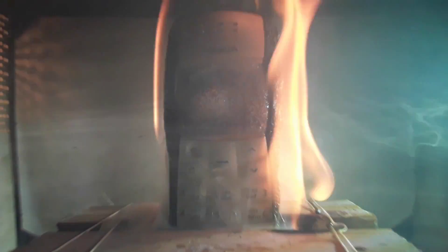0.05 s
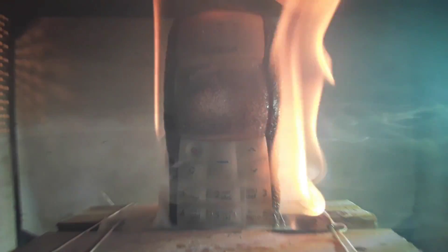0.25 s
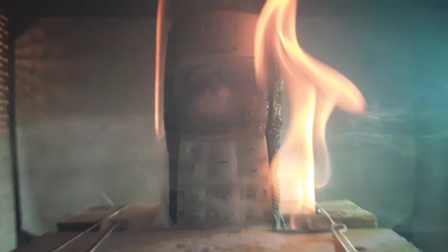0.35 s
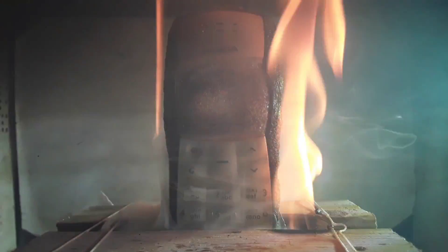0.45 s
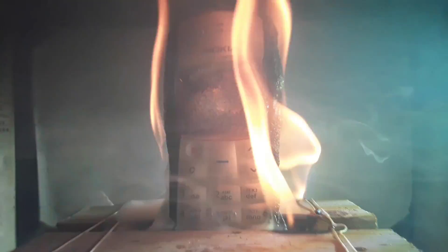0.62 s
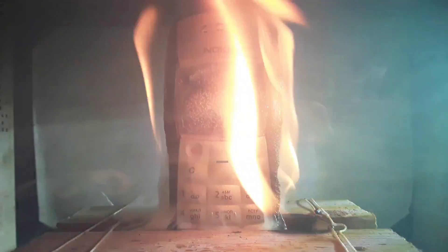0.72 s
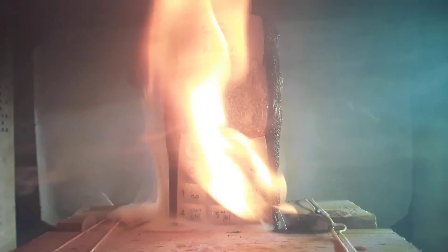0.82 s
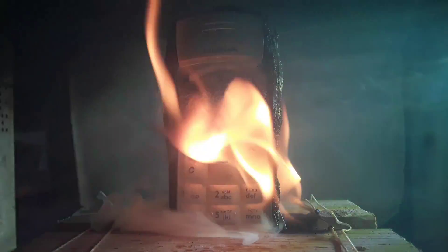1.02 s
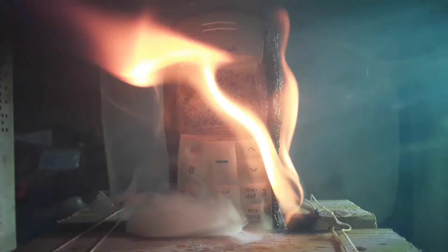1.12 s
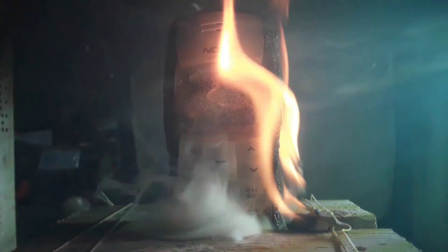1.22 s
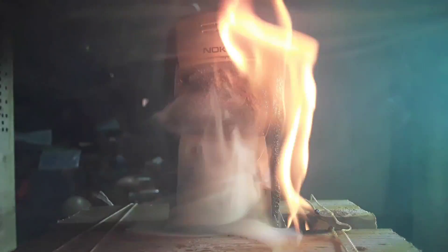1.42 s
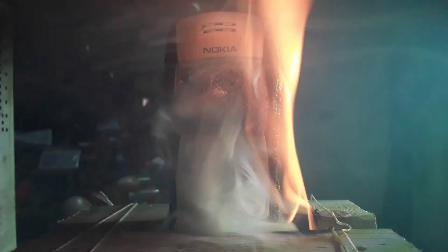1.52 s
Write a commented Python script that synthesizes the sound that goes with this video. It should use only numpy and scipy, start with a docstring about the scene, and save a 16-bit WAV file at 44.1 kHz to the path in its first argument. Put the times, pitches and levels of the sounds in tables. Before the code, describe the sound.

A humming microwave oven switches off and its door clatters open with sharp snaps.

```python
"""A kitchen: a microwave oven hums, fan running, with a phone burning inside. The switch snaps off,
the hum dies and the fan runs down. The door is pushed open with a clatter of knocks and sharp latch
snaps that ring the steel case and the room. The flames are left hissing; a brief rasp swells at the end.
The treble resonance of a close, small microphone is built into the spectra, near 8 kHz."""
import sys
import numpy as np
from scipy import signal
from scipy.fft import irfft, next_fast_len
from scipy.io import wavfile
from scipy.ndimage import uniform_filter1d

SR = 44100
rng = np.random.default_rng(int(sys.argv[2]) if len(sys.argv) > 2 else 0)


def materialize(psi):
    """Save the field psi as 16-bit PCM at rate SR to the path in sys.argv[1].

    A 1-D psi becomes a single channel; in a 2-D psi each row is a channel.
    """
    bounded = np.clip(np.atleast_2d(psi).T, -1, 1)
    quanta = np.round(bounded * 32767).astype(np.int16)
    wavfile.write(sys.argv[1], SR, quanta)


N = 68355

POWER_OFF_S = 0.528
ROOM = dict(room_db=-20.5, room_t60_s=0.51)
ROOM_TREBLE = dict(room_db=-20, room_t60_s=0.29)
# switch snap, then latch snaps: t/s, level/dB, dull part re snap/dB, ring f/Hz, t60/s
SNAP_HITS = [(.5162, -22, -2.5, 7480, 0.087), (0.643, -28, -3, 7900, 0.014),
             (0.6728, -23.5, 9, 8200, 0.051), (0.752, -20, -14, 8080, 0.1), (0.7781, -13, 1.5, 8080, 0.099),
             (0.853, -10.5, -2, 8100, 0.057), (0.8948, -19, 5.5, 8440, 0.08), (0.9145, -31, 0, 8280, 0.027),
             (1.0157, -14, 0, 8000, 0.062)]
# door knocks: t/s, thump/dB, body/dB, clack/dB, rise/s, t60/s, note f/Hz, note level/dB
DOOR_KNOCKS = [(0.6657, -44, -20, -22.5, 0.0012, 0.12, 1950, -13.5),
               (0.6901, -21, -21, -26, 0.0015, 0.19, 2250, -17.5),
               (0.7104, -32.5, -20, -22.5, .002, 0.19, 760, -14),
               (0.7194, -24, -24.5, -21, 0.0015, 0.36, 2570, -13),
               (0.7307, -33, -23.5, -19.5, .001, 0.13, 1030, -12),
               (0.7417, -15, -20.5, -24, 0.001, 0.14, 1100, -16),
               (0.7518, -16.5, -19.5, -22, 0.001, 0.065, 420, -33),
               (0.7655, -22, -22, -24.5, 0.0015, 0.067, 900, -12),
               (0.788, -33, -21.5, -26.5, 0.0019, 0.21, 1530, -34),
               (0.9057, -46, -24.5, -16.5, 0.0007, 0.051, 600, -13),
               (0.9105, -43, -24, -19, .0007, 0.068, 757, -11),
               (0.915, -59, -18, -18, 0.0006, 0.082, 2428, -21),
               (0.929, -45, -22.5, -36, .002, 0.16, 1050, -19)]


def snaps():
    """Switch, then latches: gritty crack, ringing metal, dull door body, low reverberant bloom."""
    # switch with its bracket, and door latch: f/Hz, level/dB (latch: re snap), t60/s
    switch_modes = [(650, -27, .06), (1400, -30, .06), (2030, -28, .06), (4060, -27, .05), (6300, -28, .05),
                    (6735, -24, .06), (6982, -27, .08), (7830, -20, .065), (10350, -34, .05)]
    latch_modes = [(7621, -14, .1), (7895, -10, .11), (8140, -9, .07), (8305, -11, .1), (8425, -10, .1),
                   (9033, -13, .1), (9663, -19, .08), (10360, -24, .08)]
    # noise parts of a snap: f/Hz, level/dB
    crack_spectrum = [(3000, -18.5), (5500, -13), (7000, -10), (7800, 1.5), (8400, 3), (9500, -4),
                      (11500, -20), (13500, -18.5), (16000, -33)]
    body_spectrum = [(60, -24), (250, 5.5), (700, 3), (1100, 3), (1400, 7), (1900, 6), (4000, 1.5),
                     (6000, -5), (12000, -30)]
    bloom_spectrum = [(50, -28.5), (120, -13), (260, -2), (520, 3.5), (800, -8), (2000, -8), (4000, -39)]
    crack_peak_hz = 8200
    out = ring(switch_modes, SNAP_HITS[0][0], rise_s=0.00032)
    for t_s, db, dull_db, ring_hz, t60_s in SNAP_HITS:
        grit = unit(undb(2.2 * walk(1200)))
        crack = undb(-2.5) * noise(crack_spectrum, ring_hz / crack_peak_hz) * grit
        crack *= blow(t_s, 0.00037, t60_s, hold_s=0.0043, **ROOM_TREBLE)
        body = undb(-7) * noise(body_spectrum)
        body *= blow(t_s, rise_s=0.005, t60_s=0.17, room_db=-30, room_t60_s=0.22)
        bloom = undb(-15) * noise(bloom_spectrum) * attack(t_s, 0.018) * fade(t_s, 0.42)
        out += undb(db) * (crack + undb(dull_db) * (body + bloom))
    for t_s, db, *_ in SNAP_HITS[1:]:
        out += undb(db) * ring(latch_modes, t_s, rise_s=0.00091)
    return out


def chatter():
    """Each snapping part bounces in a quick, uneven run of dry clicks."""
    # one bounce: f/Hz, level/dB, t60/s
    click_modes = [(4500, -14, .002), (7300, -6, .002), (8250, 0, .004), (10500, -14, .0015),
                   (13300, -16, .0015)]
    bounces, mean_gap_s, first_db, loss_db = 5, 0.0016, 2.6, 1
    hits = np.zeros(N)
    for t_s, db, *_ in SNAP_HITS:
        gaps_s = mean_gap_s * (0.5 + rng.random(bounces))
        times_s = t_s + np.cumsum(gaps_s) - gaps_s[0]
        hits[(times_s * SR).astype(int)] += undb(db + first_db - loss_db * np.arange(bounces))
    return signal.fftconvolve(hits, ring(click_modes, 0, rise_s=0.0001))[:N]


def door():
    """The door jolts free. Per knock: thump, hollow body, plastic clack, note of the struck part."""
    # low, damped panel modes: f/Hz, level re thump/dB, t60/s
    panel_modes = [(135, -4, .025), (245, 4, .018)]
    # noise parts of a knock: f/Hz, level/dB
    boom_spectrum = [(30, -55.5), (58, -17), (90, -19), (130, -1.5), (250, 7.5), (340, -0.5), (700, -51)]
    body_spectrum = [(150, -15), (300, -9.5), (460, -4), (620, -5), (860, -2.5), (1150, -8), (1600, -6),
                     (4000, -52.5)]
    clack_spectrum = [(600, -25.5), (1300, -33), (1900, 1.5), (2400, -5), (3000, 0), (4000, -9.5),
                      (5800, -16), (8200, -3), (10500, -21.5), (15000, -39.5)]
    boom_t60_s, note_t60_s = 0.12, 0.038
    out = np.zeros(N)
    for t_s, thump_db, body_db, clack_db, rise_s, t60_s, note_hz, note_db in DOOR_KNOCKS:
        boom = undb(-2.5) * noise(boom_spectrum) * blow(t_s, rise_s, boom_t60_s, **ROOM)
        thump = undb(thump_db) * (ring(panel_modes, t_s, rise_s) + boom)
        body = undb(body_db) * noise(body_spectrum) * blow(t_s, rise_s, t60_s, **ROOM)
        clack = undb(clack_db) * noise(clack_spectrum) * blow(t_s, rise_s, t60_s, **ROOM_TREBLE)
        rattle = unit(undb(1.5 * walk(600)))
        note = ring([(note_hz, note_db, note_t60_s)], t_s, rise_s)
        out += thump + body + clack * rattle + note
    return out


def swing():
    """The freed door wobbles on its hinges and clunks against its stop."""
    # door on its stop: f/Hz, level/dB, t60/s
    stop_modes = [(390.5, -22.5, 0.19), (479, -16, 0.18), (1000, -33.5, 0.066), (1242, -27, 0.19)]
    wobble_hz, wobble_db, wobble_t60_s = 58, -29, 0.7
    wobble = ring([(wobble_hz, wobble_db, wobble_t60_s)], t_s=0.743, rise_s=0.0043)
    return wobble + ring(stop_modes, t_s=0.914, rise_s=0.00123)


def scrape():
    """The metal latch hook drags briefly over its catch."""
    # hook resonances: f/Hz, width/Hz, level/dB
    hook_bands = [(3540, 220, -31.5), (4610, 220, -25.5), (4970, 200, -28.5)]
    t_s, hold_s = 0.7215, 0.0068
    return stirred(hook_bands) * attack(t_s, 0.00207) * fade(t_s + hold_s, 0.05)


def case():
    """Every knock and snap rings the steel case; reflections blur its modes."""
    # steel case: f/Hz, level/dB, t60/s
    case_modes = [(128.2, -44, 0.92), (256, -44, 0.9), (480, -41, 0.49), (505, -41, 0.66), (845, -36, 0.4),
                  (980, -37.5, 0.34), (1050, -37.5, 0.26), (1212, -39, 0.33), (1860, -35, 0.11),
                  (2040, -42, 0.45), (2566, -45, 0.17), (2923, -46, 0.2), (3490, -43, 0.16)]
    snap_drive_db, rise_s, blur_hz = 2.5, 0.004, 55
    max_body_db = max(row[2] for row in DOOR_KNOCKS)
    max_snap_db = max(row[1] for row in SNAP_HITS)
    hits = np.zeros(N)
    for t_s, _, body_db, *_ in DOOR_KNOCKS:
        hits[int(t_s * SR)] += undb(body_db - max_body_db) ** 2
    for t_s, db, dull_db, *_ in SNAP_HITS:
        hits[int(t_s * SR)] += undb(snap_drive_db + db + dull_db - max_snap_db) ** 2
    rise_pole = np.exp(-1 / (rise_s * SR))
    drive = signal.lfilter([1 - rise_pole], [1, -rise_pole], hits) + 1e-18
    out = np.zeros(N)
    for hz, db, t60_s in case_modes:
        decay_pole = np.exp(-2 * np.log(1000) / (t60_s * SR))
        energy = signal.lfilter([1], [1, -decay_pole], drive)
        out += undb(db) * np.sqrt(energy) * np.sin(2 * np.pi * hz * since(0) + 2 * walk(blur_hz))
    return out


def transformer():
    """Mains hum that dies quickly at power-off."""
    # hum: harmonic number, rms level/dB
    harmonics = [(1, -35.5), (2, -43), (3, -51.5), (4, -47.5), (5, -53.5)]
    hum_hz = 100.37
    hum = sum(undb(db) * sine(k * hum_hz * since(0)) for k, db in harmonics)
    return np.sqrt(2) * hum * fade(POWER_OFF_S, 0.14)


def fan():
    """Wavering blade tones, stirred case and rushing air; the fan runs down after power-off."""
    # blade tones: harmonic number, rms level/dB
    harmonics = [(1, -43.5), (2, -45), (3, -49.5), (4, -51), (6, -57)]
    # case resonances: f/Hz, width/Hz, level/dB
    drone_bands = [(116.3, 20, -55), (410, 30, -48), (440.3, 45, -48), (509, 18, -51), (1044, 30, -54)]
    # air rush: f/Hz, level/dB
    air_spectrum = [(24, -70), (40, -15.5), (66, -31.5), (91, -5), (244, -10.5), (432, -5), (784, -15.5),
                    (2580, -20.5), (4230, -32.5), (8270, -35), (15000, -74)]
    blade_hz, sag_per_s, waver_db = 144.1, 0.65, 2.5
    cycles = np.cumsum(blade_hz * np.exp(-sag_per_s * since(POWER_OFF_S))) / SR
    blades = sum(undb(db + waver_db * walk(11)) * sine(k * cycles) for k, db in harmonics)
    running = np.sqrt(2) * blades + stirred(drone_bands) + undb(-35.5) * noise(air_spectrum)
    return running * fade(POWER_OFF_S, 1.08)


def flames():
    """Burning plastic hisses in swells with a fine flicker, and spits once, faintly."""
    # hiss and spit: f/Hz, level/dB
    hiss_spectrum = [(500, -20), (2000, -7), (5500, -12.5), (7000, -7), (8250, 2.5), (9500, -10),
                     (11500, -26), (15000, -36)]
    spit_spectrum = [(1200, -22), (2400, -9), (3100, 7), (3900, -11), (7000, -20), (12000, -35)]
    # hiss swells: t/s, level/dB
    swells = [(0, -49.5), (.1, -44.5), (.25, -37), (.38, -41), (0.458, -47.5), (0.619, -53.5),
              (1.149, -61.5), (1.43, -67), (1.482, -48.5), (1.52, -44.5), (1.55, -45)]
    spit_s, flicker_db = 1.247, 0.5
    spit = undb(-56.5) * noise(spit_spectrum) * attack(spit_s, 0.0025) * fade(spit_s, 0.058)
    hiss_db = np.interp(since(0), *np.transpose(swells))
    return noise(hiss_spectrum) * undb(hiss_db + flicker_db * walk(400)) + spit


def rasp():
    """A soft rasp swells at the end and starts to fall."""
    # rasp: f/Hz, level/dB
    spectrum = [(100, -29), (900, -9), (1400, -4), (1850, 6), (3200, 1.5), (5500, -8), (8200, -4),
                (11000, -32), (15000, -43)]
    peak_s, rise_s, fall_s = 1.518, 0.015, 0.1
    age_s = since(0) - peak_s
    envelope = np.exp(np.minimum(age_s / rise_s, -age_s / fall_s))
    return undb(-42 + 1.9 * walk(250)) * noise(spectrum) * envelope


def kitchen():
    """Steady, quiet room noise."""
    # room noise: f/Hz, level/dB
    spectrum = [(18, -62), (30, -35), (75, -3.5), (99, -18), (260, -15), (304, -25.5), (384, -16),
                (735, -25), (2130, -36), (4900, -74), (8250, -22.5), (15000, -69)]
    return undb(-57) * noise(spectrum)


def ring(modes, t_s, rise_s):
    """Struck modes (f/Hz, level/dB, t60/s) that swell briefly and decay."""
    tone = sum(undb(db) * fade(t_s, t60_s) * sine(hz * since(t_s)) for hz, db, t60_s in modes)
    return tone * attack(t_s, rise_s)


def stirred(bands):
    """Resonances (f/Hz, width/Hz, level/dB) kept ringing by irregular pushes."""
    out = np.zeros(N)
    for hz, width_hz, db in bands:
        pushes = walk(width_hz) + 1j * walk(width_hz)
        out += undb(db) * np.real(pushes * np.exp(2j * np.pi * hz * since(0)))
    return out


def noise(spectrum, pitch_ratio=1):
    """Noise of rms 1, shaped by spectral density points (f/Hz, level/dB)."""
    hz, db = np.array(spectrum, float).T
    size = next_fast_len(N)
    bins_hz = np.maximum(np.fft.rfftfreq(size, 1 / SR), 1)
    gain = undb(np.interp(np.log(bins_hz), np.log(hz * pitch_ratio), db))
    phasors = np.exp(2j * np.pi * rng.random(len(bins_hz)))
    return unit(irfft(gain * phasors, size)[:N])


def blow(t_s, rise_s, t60_s, room_db, room_t60_s, hold_s=0):
    """Impact envelope: rise, hold, decay of the oven, tail of the kitchen."""
    tail = undb(room_db) * fade(t_s, room_t60_s)
    return attack(t_s, rise_s) * np.hypot(fade(t_s + hold_s, t60_s), tail)


def attack(t_s, rise_s):
    """0 until t_s, then an exponential approach to 1."""
    return 1 - np.exp(-since(t_s) / rise_s)


def fade(t_s, t60_s):
    """1 until t_s, then an exponential decay."""
    return np.exp(-np.log(1000) * since(t_s) / t60_s)


def walk(rate_hz):
    """Smooth random wander of rms 1."""
    step = max(int(SR / rate_hz), 1)
    stairs = np.repeat(rng.standard_normal(N // step + 1), step)
    return unit(uniform_filter1d(stairs, step)[:N])


def sine(cycles):
    """Sine with a random starting phase."""
    return np.sin(2 * np.pi * (cycles + rng.random()))


def since(t_s):
    """Seconds since t_s, 0 before it."""
    return np.maximum(np.arange(N) / SR - t_s, 0)


def undb(db):
    """Decibels to gain."""
    return 10 ** (np.asarray(db) / 20)


def unit(x):
    """Scale to rms 1."""
    return x / np.sqrt(np.mean(x ** 2))


def scene():
    """Oven, door and fire in a quiet kitchen; mono."""
    oven = transformer() + fan()
    clatter = snaps() + chatter() + door() + scrape() + case() + swing()
    return (oven + clatter + flames() + rasp() + kitchen())[None]


def record(dry):
    """The recorder cuts the deepest bass and the top."""
    low_hz, top_hz = 38, 15600
    highpass = signal.butter(4, low_hz, "high", fs=SR, output="sos")
    lowpass = signal.ellip(8, 0.2, 70, top_hz, fs=SR, output="sos")
    return signal.sosfilt(lowpass, signal.sosfilt(highpass, dry))


dry = scene()
out = record(dry)
materialize(out)
```